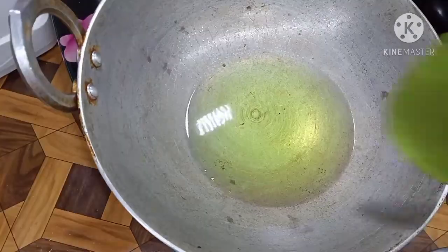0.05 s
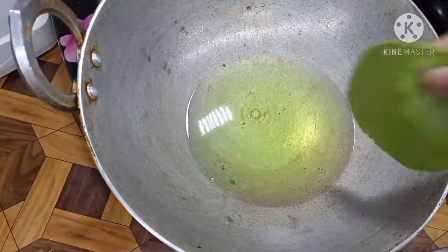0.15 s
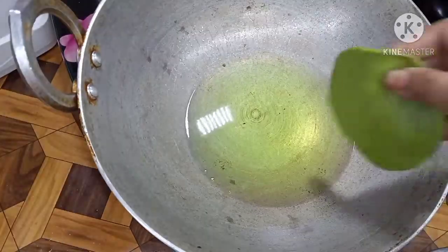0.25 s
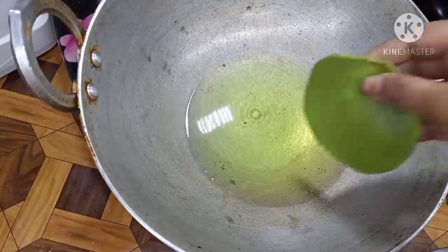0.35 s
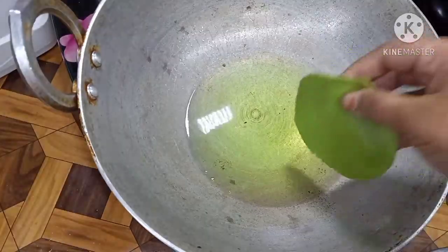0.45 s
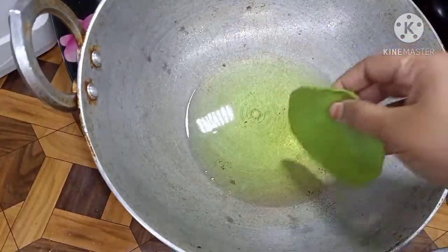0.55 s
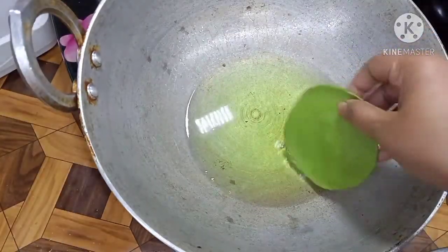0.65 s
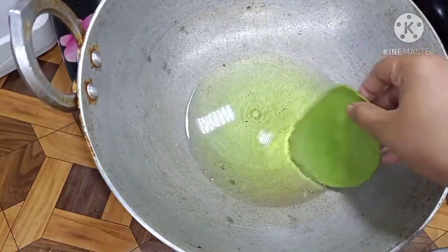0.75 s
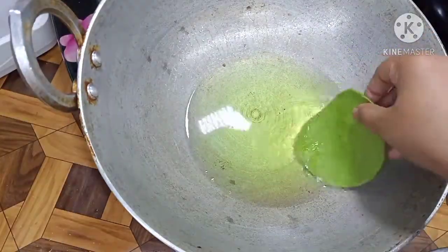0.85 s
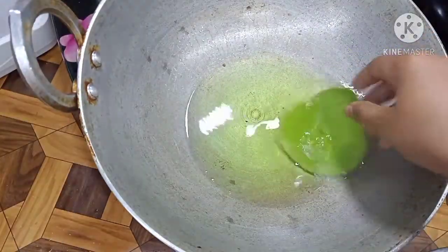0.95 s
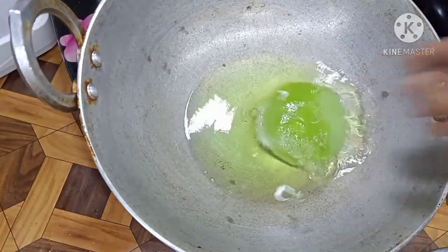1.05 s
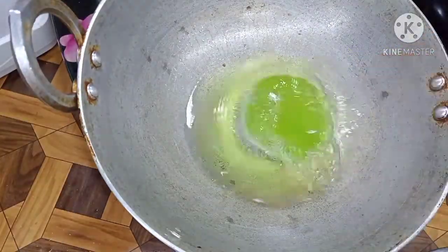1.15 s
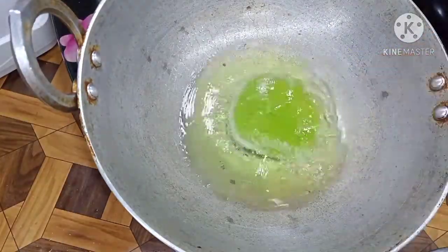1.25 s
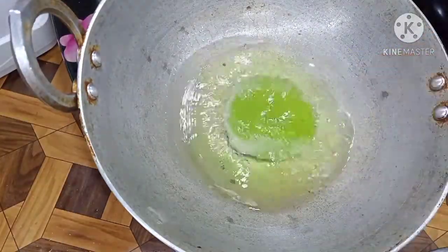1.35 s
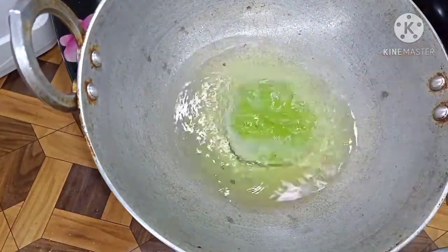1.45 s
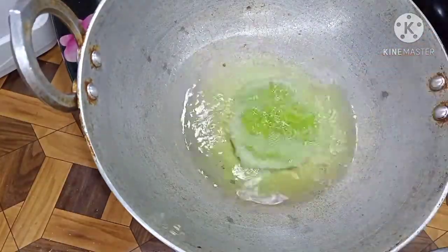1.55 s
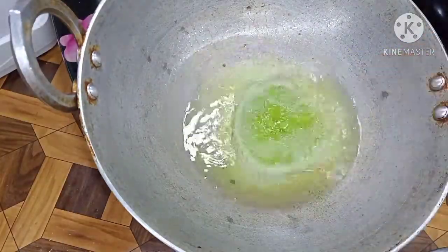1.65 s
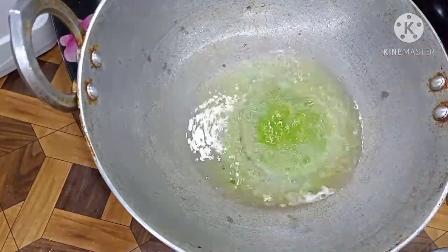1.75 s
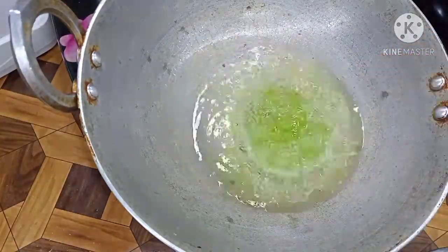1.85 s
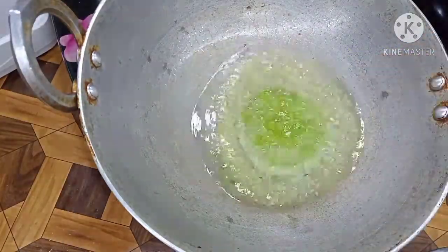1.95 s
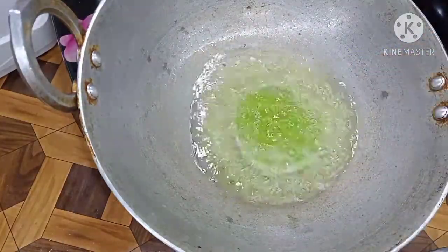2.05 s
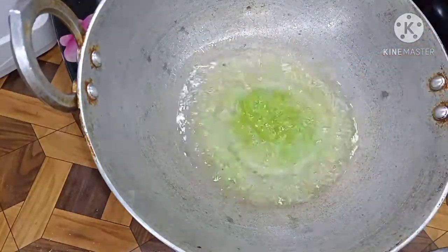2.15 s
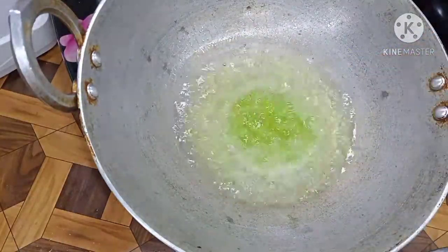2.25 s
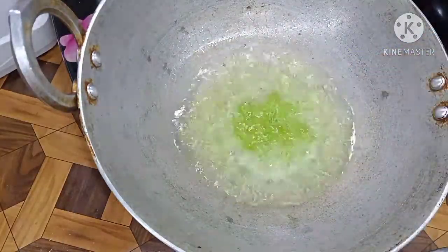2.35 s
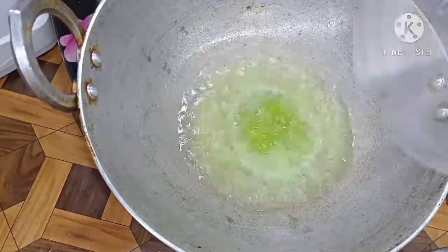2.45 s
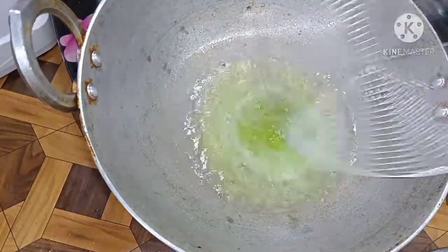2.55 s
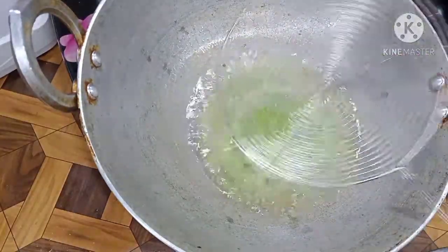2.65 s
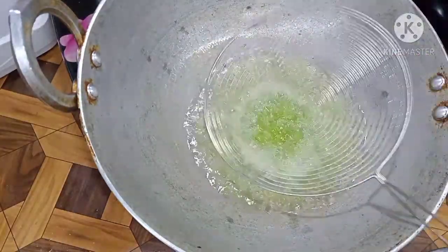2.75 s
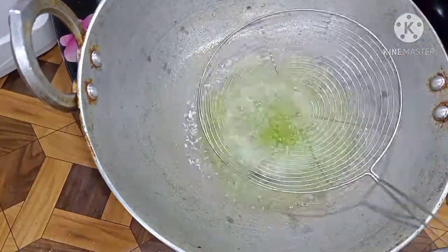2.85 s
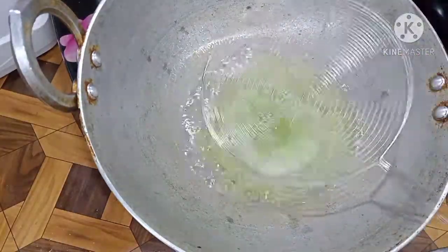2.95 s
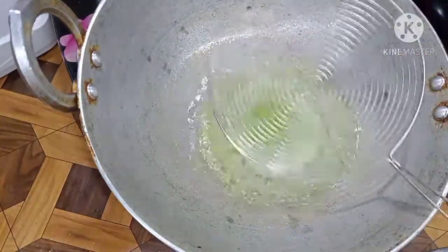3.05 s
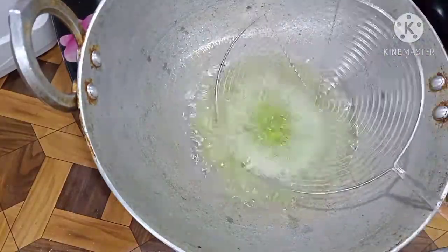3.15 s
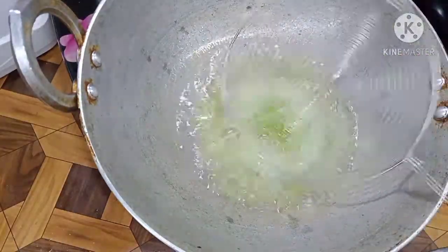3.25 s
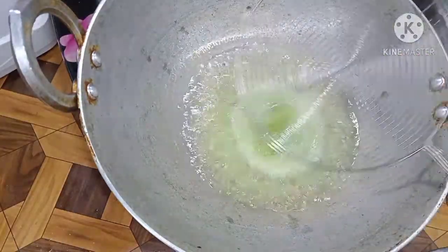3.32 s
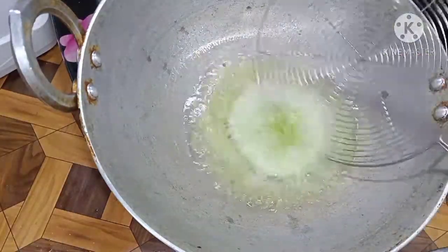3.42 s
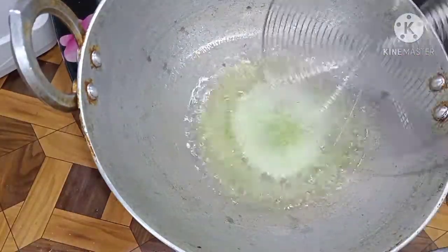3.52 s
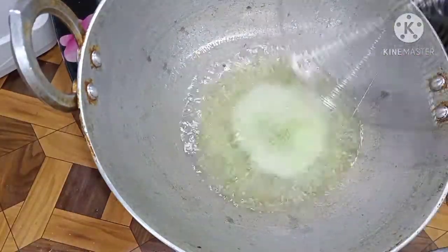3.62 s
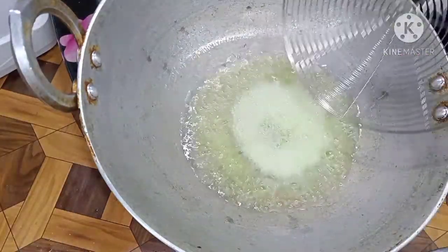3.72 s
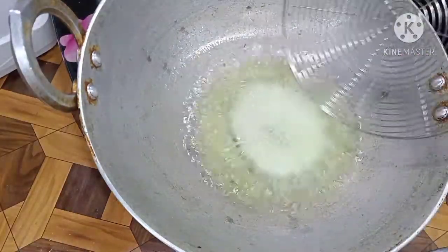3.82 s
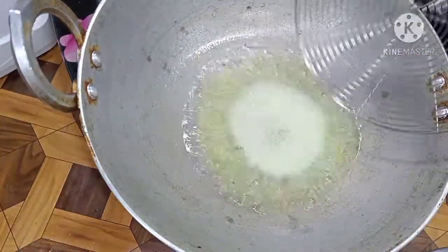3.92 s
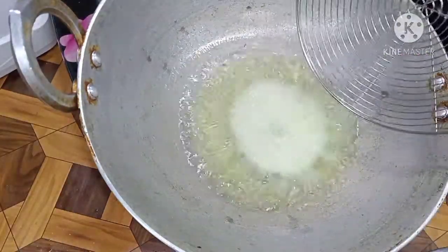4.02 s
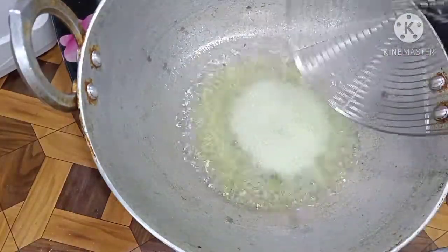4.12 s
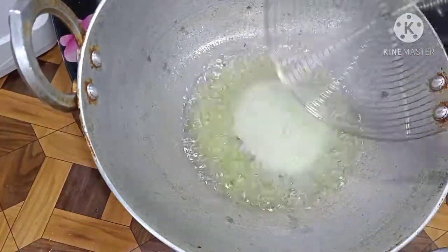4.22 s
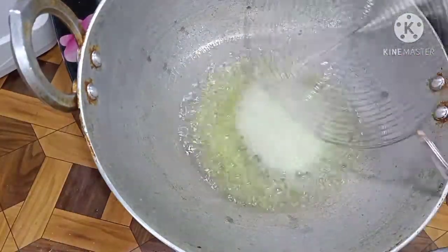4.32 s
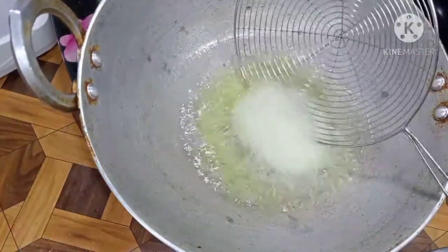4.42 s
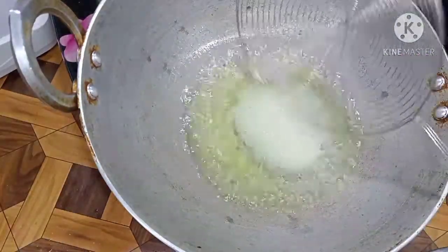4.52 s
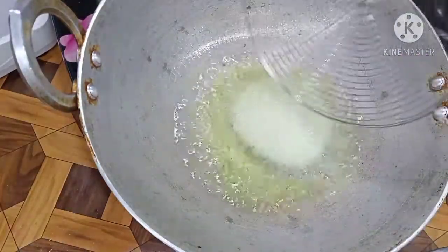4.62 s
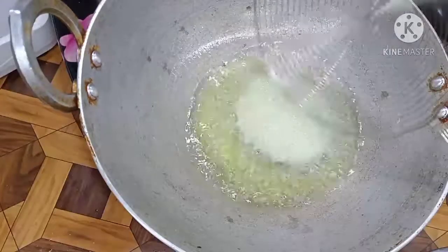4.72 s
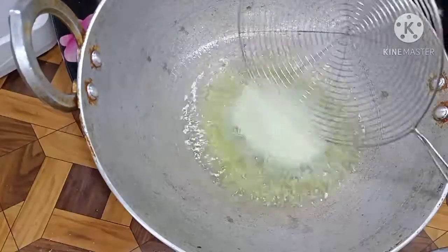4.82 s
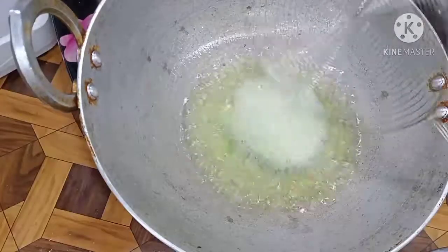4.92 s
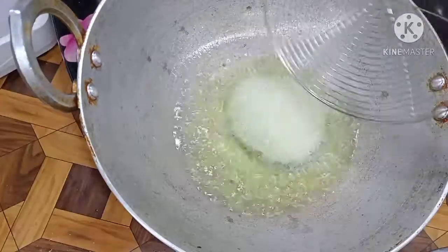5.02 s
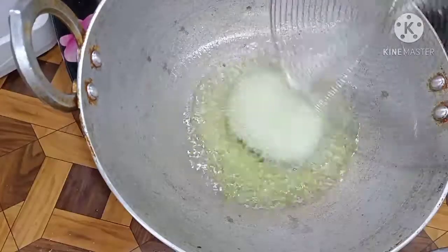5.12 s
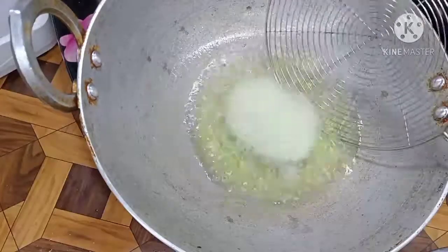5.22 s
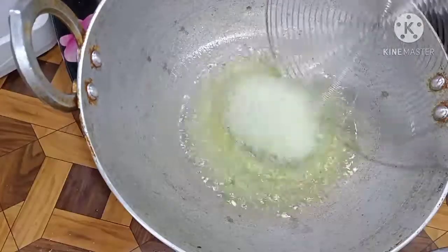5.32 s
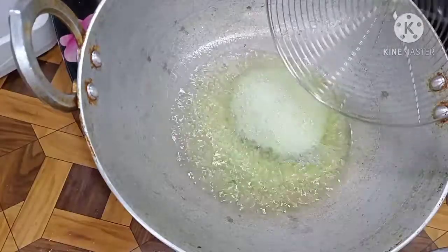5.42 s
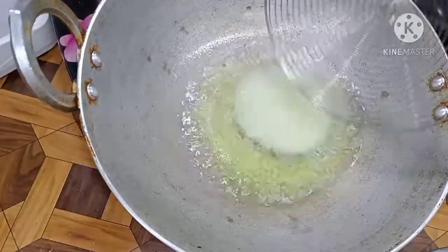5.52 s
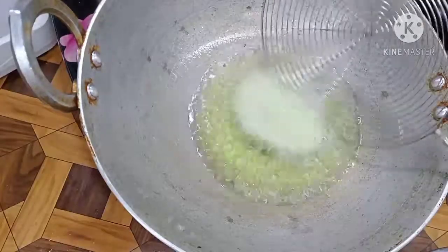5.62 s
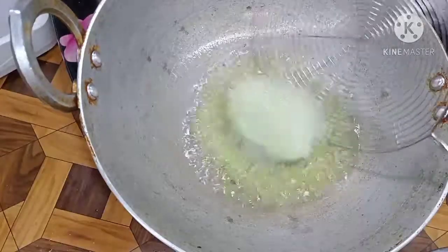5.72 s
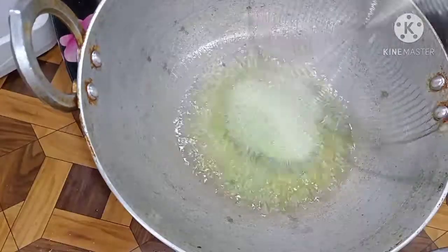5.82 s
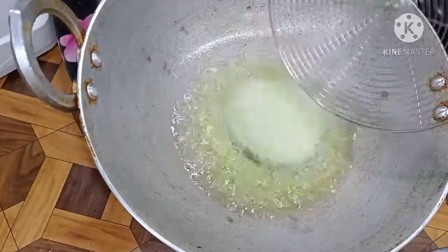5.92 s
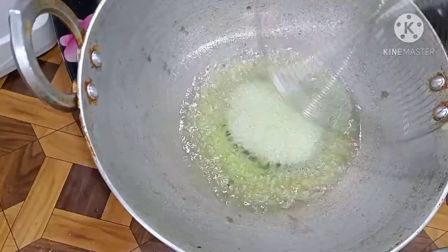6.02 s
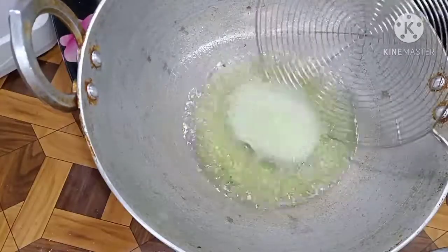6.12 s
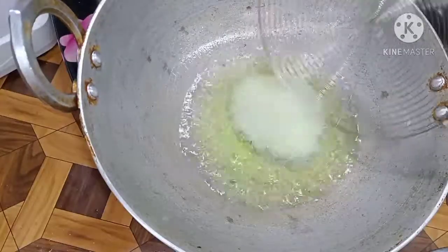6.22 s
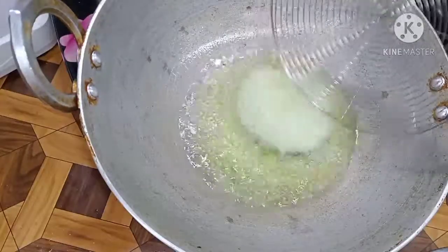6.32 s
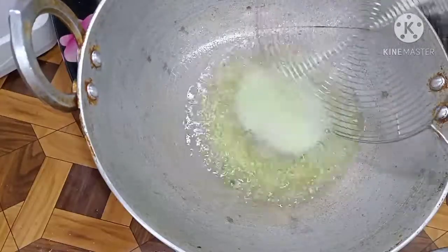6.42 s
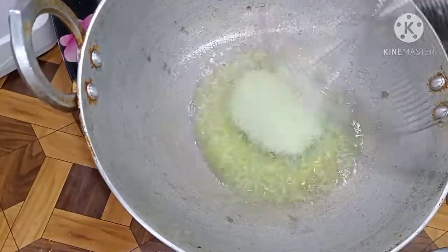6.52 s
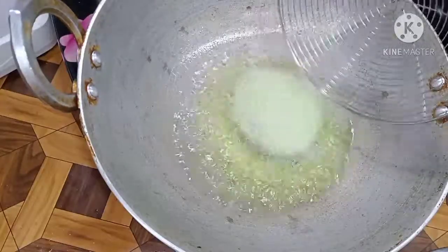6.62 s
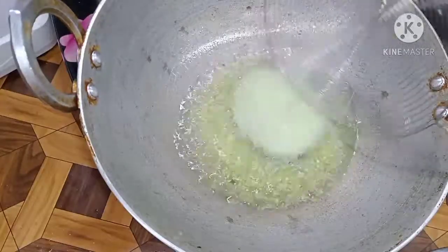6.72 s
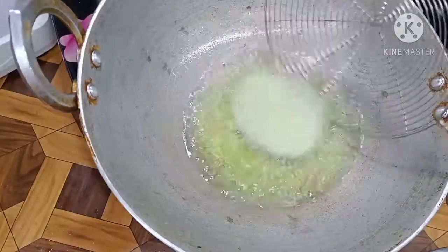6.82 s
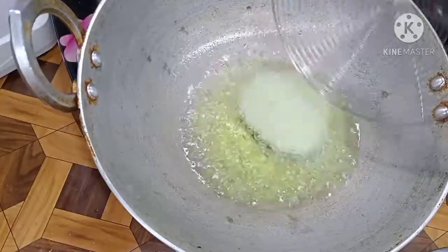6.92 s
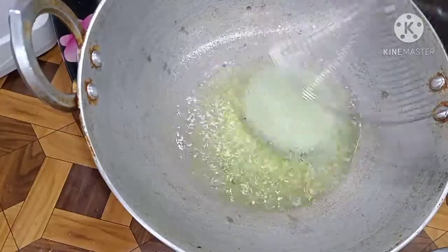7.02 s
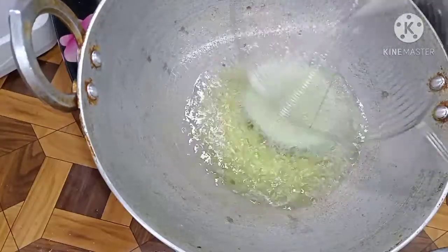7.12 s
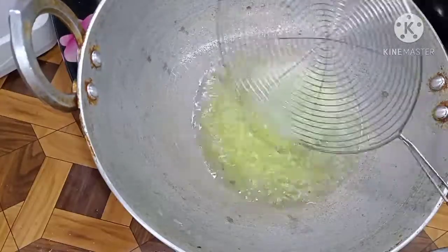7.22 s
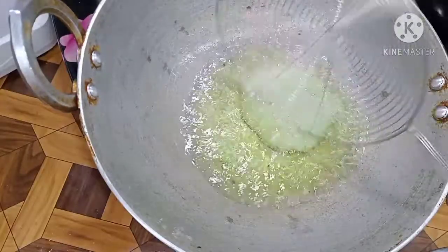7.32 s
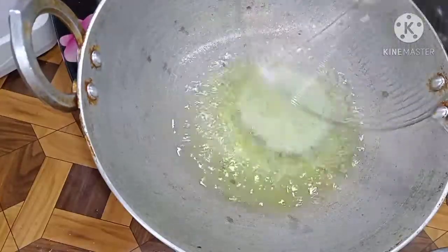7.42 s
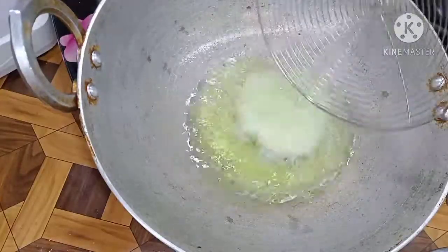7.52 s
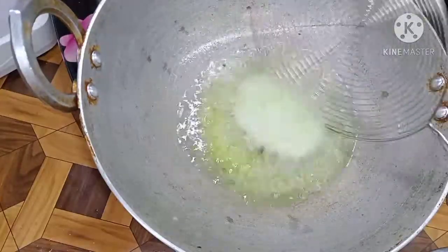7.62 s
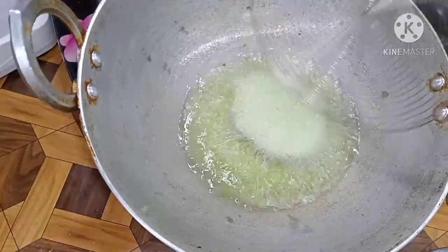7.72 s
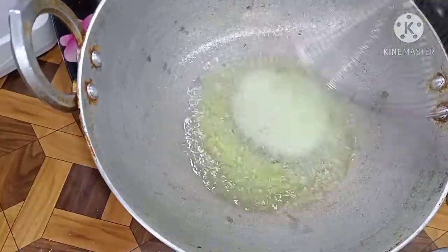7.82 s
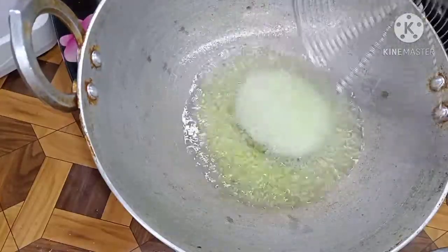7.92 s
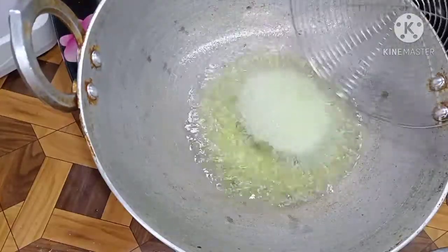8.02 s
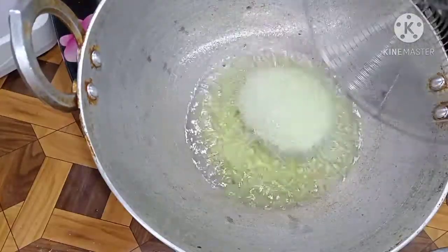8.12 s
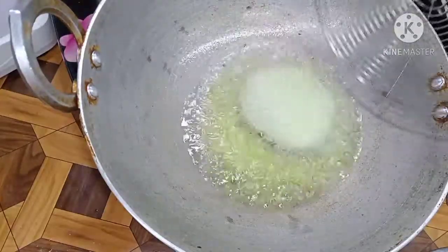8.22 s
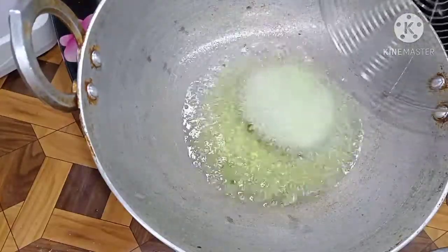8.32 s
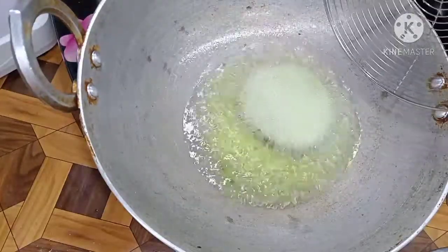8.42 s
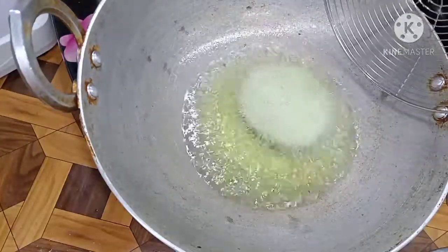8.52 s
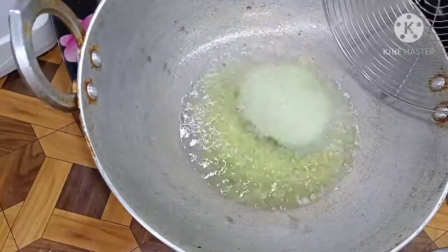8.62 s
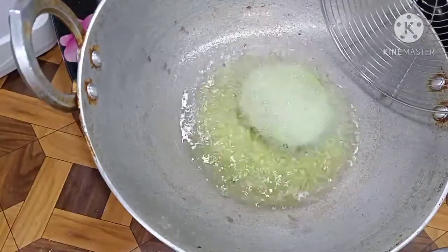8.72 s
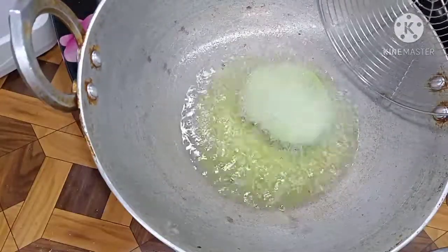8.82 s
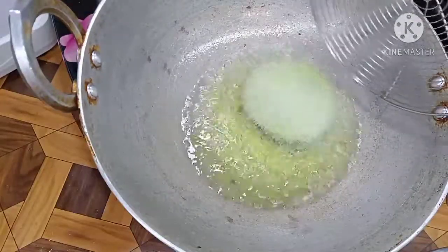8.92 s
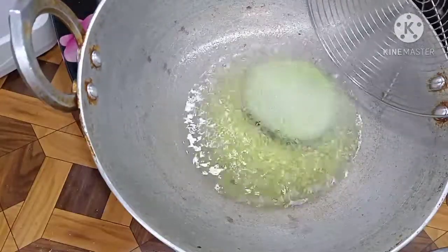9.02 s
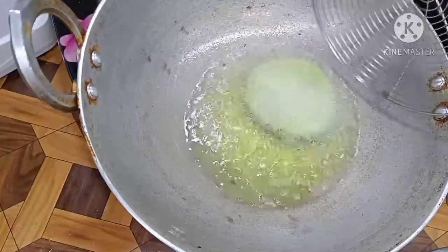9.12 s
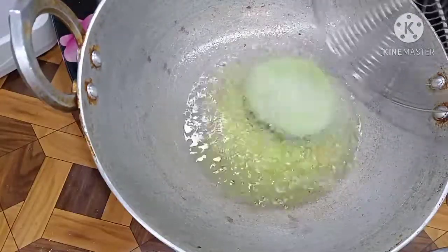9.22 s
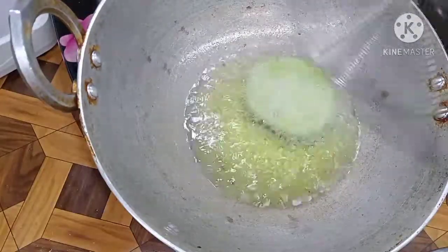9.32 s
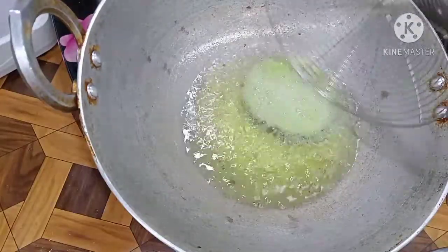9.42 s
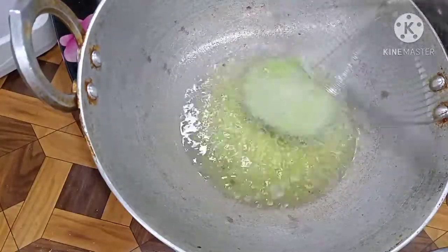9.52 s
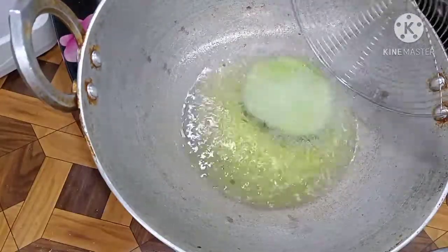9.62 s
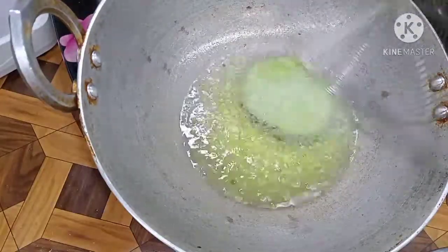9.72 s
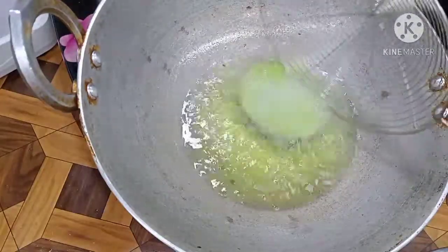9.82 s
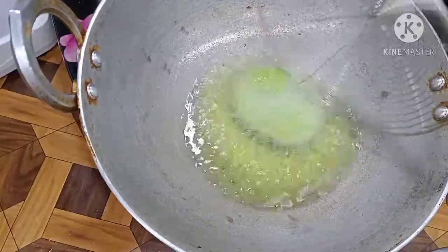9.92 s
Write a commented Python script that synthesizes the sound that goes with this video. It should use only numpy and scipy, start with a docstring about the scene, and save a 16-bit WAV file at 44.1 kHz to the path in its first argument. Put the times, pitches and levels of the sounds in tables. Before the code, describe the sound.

Dough frying in hot oil, heard close and dry with a very short room tail. Nearly quiet at first, then a soft wet hiss grows into busy sizzling and irregular low bubble knocks. One hard crack of spitting water and a quick metallic chatter of the skimmer stand out early. Later come two tiny squeaky pops, scattered plops, and rising fine fizz that stays strong to the end.

```python
"""A round of dough fries in hot oil in a metal wok, heard from close above in a small kitchen.
Its steam simmers, sizzles and fizzes as dense coloured crackle; bigger bubbles plop as short decaying tones.
Noise with narrow peaks whistles at the wet edge, steam pockets squeak as brief tones, droplets hiss as fine crackle.
Water spits as cracks with short rings, and a wire skimmer chatters once on the wok as struck metal modes.
Underneath, coloured noise makes the stove's faint hiss and rumble."""
import sys
import numpy as np
from scipy import signal
from scipy.fft import rfft, irfft, next_fast_len
from scipy.io import wavfile
from scipy.ndimage import uniform_filter1d, map_coordinates

SR = 44100
rng = np.random.default_rng(int(sys.argv[2]) if len(sys.argv) > 2 else 0)


def transcribe(u):
    """Save the signal u as a 16-bit wav file named by the first command-line argument.

    u: samples, shape (n,) or (channels, n), limited to [-1, 1]; the rate is SR.
    q: integer samples, one column per channel.
    """
    v = np.clip(np.atleast_2d(u).T, -1, 1)
    q = np.round(v * 32767).astype(np.int16)
    wavfile.write(sys.argv[1], SR, q)


N = 438794
TOUCH_S = 0.8  # the dough meets the oil

# the biggest steam bubbles bursting: t/s, peak before the room/dB, pitch f/Hz
BIG_BUBBLES = [(1.197, -38.5, 1380), (1.595, -38.5, 1710), (1.736, -33.5, 1580), (1.899, -27.5, 1410),
               (2.048, -30.5, 1150), (2.27, -26, 1410), (2.391, -28.5, 1120), (2.431, -26.5, 1120),
               (2.542, -25.5, 1450), (2.653, -30, 1390), (2.664, -22.5, 1800), (2.6865, -24, 1680),
               (2.709, -28, 1740), (2.787, -26, 1230), (2.844, -27, 1090), (2.964, -29.5, 1710),
               (3.037, -29.5, 1730), (3.077, -29, 820), (3.2128, -22.5, 885), (3.248, -30, 1800),
               (3.286, -26.5, 1370), (3.43, -21, 1390), (3.539, -27.5, 850), (3.746, -24.5, 854),
               (3.7743, -24, 2140), (3.8205, -29, 800), (3.881, -27, 1470), (4.097, -27, 656),
               (4.14, -29.5, 900), (4.269, -32, 1000), (4.607, -28.5, 1230), (4.743, -30, 1260),
               (4.787, -34, 930), (4.882, -32, 850), (4.894, -30, 1100), (5.072, -29.5, 684),
               (5.298, -26, 1310), (5.304, -29, 750), (5.498, -26.5, 970), (5.515, -29, 710),
               (5.599, -27.5, 1000), (5.757, -29, 1050), (5.96, -20.5, 1160), (5.998, -33, 900),
               (6.012, -28, 800), (6.088, -30.5, 760), (6.151, -27.5, 1300), (6.199, -33, 800),
               (6.209, -29.5, 1100), (6.371, -31.5, 870), (6.463, -31.5, 790), (6.516, -29, 940),
               (6.632, -31.5, 1080), (6.673, -27, 865), (6.875, -30, 1700), (7.193, -28.5, 1450),
               (7.317, -22.5, 1140), (7.347, -29, 2070), (7.586, -29, 875), (7.607, -29.5, 1310),
               (7.697, -27, 790), (7.943, -25.5, 1080), (7.994, -33, 770), (8.119, -29.5, 1090)]
# steam pockets squeezing out from under the dough: t/s, peak before the room/dB, pitch f/Hz, swell and fade time/s
STEAM_POCKETS = [(1.034, -52, 2590, 0.0027), (1.055, -59, 1880, .012), (1.172, -57, 1220, .016),
                 (6.206, -28, 2830, 0.0038), (6.8685, -22.5, 2910, 0.0012)]
# colour of the bubbles ringing in the bowl of the wok: f/Hz, relative level/dB
WOK_COLOUR = [(130, -16.5), (250, -12), (355, -9), (434, -1.5), (699, 2), (822, -1), (968, -6),
              (1140, -0.5), (1520, -3), (1700, -2.5), (1900, 2), (2540, 2.5), (2840, -3.5), (3220, -1),
              (5000, -24), (6500, -58), (11000, -120)]
# colour of the smallest bubbles: f/Hz, relative level/dB
FIZZ_COLOUR = [(2940, -19), (3900, -7), (5000, -8), (6100, -13), (6740, -10), (7560, -8), (8060, -2),
               (8420, 1), (8910, -1.5), (9780, -9.5), (10500, -13.5), (13600, -17), (22000, -120)]
# colour of the finest spray: f/Hz, relative level/dB
MIST_COLOUR = [(6180, -37), (10500, -2), (12400, -6.5), (14900, 4.5), (15600, 1)]
# boil, strong while the dough is pressed under and again when it is basted: t/s, level/dB
BOIL_LEVEL = [(1.1, -90), (1.87, -62), (1.98, -50.5), (3.8, -50.5), (4.4, -51.5), (5.2, -61), (7.4, -54.5),
              (7.65, -50), (8.1, -55.5), (9.55, -57), (9.9, -53)]
# sizzle, which climbs as the dough heats through: t/s, level/dB
SIZZLE_LEVEL = [(0.8, -84), (0.87, -71), (1.0, -65), (1.39, -57.5), (2.25, -53), (2.63, -53), (2.86, -51),
                (4.11, -50.5), (4.95, -47.5), (6.38, -49.5), (7.4, -47.5), (8.04, -48.5), (8.9, -46.5),
                (9.28, -49), (9.95, -49)]
# fizz, which swells whenever fresh oil washes over the dough: t/s, level before the trim in frying()/dB
FIZZ_LEVEL = [(0.79, -85), (0.85, -78.5), (1.24, -58), (1.45, -62), (1.69, -58.4), (1.84, -66.7),
              (2.47, -61.5), (2.8, -64), (3.07, -60.5), (3.37, -62.8), (3.43, -57), (3.64, -62.5),
              (4.47, -56.9), (4.65, -59.5), (4.92, -53.5), (5.1, -57.5), (5.4, -51.9), (5.55, -56.5),
              (5.88, -53.5), (6.06, -57.5), (6.51, -56.5), (6.84, -53), (7.38, -54.8), (7.5, -51),
              (7.65, -59.5), (7.83, -52), (9.08, -48.5), (9.38, -51), (9.53, -50), (9.95, -52)]


def amp(db):
    """Decibels to gain."""
    return 10 ** (np.asarray(db) / 20)


def unit(x):
    """Scale to rms 1."""
    return x / np.sqrt(np.mean(x ** 2) + 1e-20)


def along(points, hz):
    """(Hz, value) points read on a log frequency axis."""
    f, value = np.transpose(points)
    return np.interp(np.log(hz + 1), np.log(f + 1), value)


def level_curve(rows):
    """(s, dB) points as one level per sample, -120 dB before the first."""
    s, db = np.transpose(rows)
    return np.interp(np.arange(N) / SR, s, db, left=-120)


def follows(level_db, grows):
    """A level that swings more or less than another one and meets it at the top."""
    return level_db.max() + grows * (level_db - level_db.max())


def envelope(t, attack, hold, t60):
    """Gain at t seconds after the start: rise, hold, fade."""
    return np.clip(t / attack, 0, 1) * amp(-60 * np.maximum(t - attack - hold, 0) / t60)


def wobble(rate):
    """A smooth random curve, rate knots a second."""
    knots = rng.standard_normal(int(N * rate / SR) + 4)
    return map_coordinates(knots, [np.arange(N) * rate / SR])


def filtered(x, response):
    """x shaped by a response given as a function of frequency."""
    m = next_fast_len(N + SR // 2)
    return irfft(rfft(x, m) * response(np.fft.rfftfreq(m, 1 / SR)), m)[:N]


def noise(spectrum):
    """Coloured noise of rms 1."""
    return unit(filtered(rng.standard_normal(N), lambda hz: amp(along(spectrum, hz))))


def singing(peaks):
    """Noise of rms 1 in narrow resonances."""
    def response(f):
        return sum(amp(db) * 1j * f * width / (centre * centre - f * f + 1j * f * width)
                   for centre, width, db in peaks)
    return unit(filtered(rng.standard_normal(N), response))


def impulse(spectrum, size=2048):
    """The minimum-phase impulse response that has this spectrum."""
    gain = amp(along(spectrum, np.fft.rfftfreq(size, 1 / SR)))
    cepstrum = irfft(np.log(np.maximum(gain, 1e-3)))
    # fold the cepstrum so that the response is causal
    cepstrum[1:size // 2] *= 2
    cepstrum[size // 2 + 1:] = 0
    return irfft(np.exp(rfft(cepstrum)))


def kitchen(x, wet_db):
    """x with a short diffuse tail from the walls close by, each frequency dying at its own rate."""
    # decay of the room: f/Hz, t60/s
    wall_decay = [(200, 0.096), (3000, 0.11), (12000, 0.062)]
    hz, t, z = signal.stft(rng.standard_normal(SR // 4), SR, nperseg=256)
    decay = amp(-60 * t / along(wall_decay, hz)[:, None])
    tail = signal.istft(z * decay, SR, nperseg=256)[1]
    tail[:SR // 400] = 0  # gap before the walls answer
    tail *= amp(wet_db) / np.linalg.norm(tail)
    tail[0] = 1  # direct sound
    return signal.fftconvolve(x, tail)


def add(track, s, x):
    """Mix x into the track at time s."""
    part = track[max(round(s * SR), 0):][:len(x)]
    part += x[:len(part)]


def low_cut(x, edge_hz):
    """Small sources radiate little bass."""
    return signal.lfilter(*signal.butter(2, edge_hz, "high", fs=SR), x)


def bounced(x, delay, share):
    """x and its reflection off the side of the wok, delay in seconds."""
    lag = max(round(delay * SR), 1)
    return np.pad(x, (0, lag)) + share * np.pad(x, (lag, 0))


def bubble(hz, cycles, size=1024):
    """A pocket of steam rings for a few cycles, with a softened start."""
    turns = hz * np.arange(size) / SR
    return np.sin(2 * np.pi * turns) * np.exp(-turns / cycles) * (1 - np.exp(-2 * np.pi * turns))


def burst(hz, cycles, swell, size=1024):
    """A big bubble swings up for a fraction of a cycle, bursts at a quarter of the length and rings down."""
    turns = hz * (np.arange(size) - size // 4) / SR
    return np.sin(2 * np.pi * turns) * np.exp(np.minimum(turns / swell, -turns / cycles))


def crackle(spectrum, rate, spread_db, wet_db):
    """A dense rain of tiny bursts of uneven size, rate a second on average, rms 1."""
    hits = rng.random(N) < rate / SR
    sizes = amp(spread_db * np.minimum(rng.standard_normal(N), np.e))
    bursts = hits * rng.choice([-1, 1], N) * sizes
    return unit(signal.fftconvolve(kitchen(bursts, wet_db), impulse(spectrum))[:N])


def struck(modes, contact_t60, ring_t60, ring_db):
    """Metal rings hard during the contact, then dies away more softly; rms 1 over its first hundredth of a second."""
    t = np.arange(SR // 5) / SR
    ring = np.zeros(len(t))
    for (hz, db), (level, turn, drift) in zip(modes, rng.standard_normal((len(modes), 3))):
        ring += amp(db + 2 * level) * np.sin(2 * np.pi * (hz + 20 * drift) * t + .5 * turn)
    ring *= amp(-60 * t / contact_t60) + amp(ring_db - 60 * t / ring_t60)
    return ring / np.std(ring[:SR // 100])


def stove(hiss_db=-72, whistle_db=-82, rumble_db=-72.5, churn_db=-19.5):
    """The burner's faint hiss and whistle over a low rumble, which grows as the oil churns."""
    # colour of stove and kitchen: f/Hz, relative level/dB
    hiss_colour = [(88, -28), (150, -17), (186, -7), (205, -7), (437, -11), (541, -8.5), (1610, -16),
                   (1950, -12.5), (2930, -18), (3700, -21.5), (3930, -24), (6380, -37.5), (8380, -28),
                   (9600, -34.5), (15600, -39)]
    # thin burner tones: f/Hz, width/Hz, relative level/dB
    burner_tones = [(1860, 49, -3.5), (3550, 25, -5), (5230, 40, -19)]
    # colour of the low rumble: f/Hz, relative level/dB
    rumble_colour = [(15, -57), (25, -36), (38, -32), (55, -5.5), (75, 4.5), (176, 3.5), (214, -3.5),
                     (330, -1.5), (430, -48), (730, -120)]
    churn = amp(level_curve(SIZZLE_LEVEL) + churn_db)  # the oil's rumble against the sizzle
    rumble_gain = np.hypot(amp(rumble_db), churn) * amp(2.0 * wobble(5.9))
    hiss = amp(hiss_db) * noise(hiss_colour)
    whistle = amp(whistle_db) * singing(burner_tones)
    return hiss + whistle + rumble_gain * noise(rumble_colour)


def skimmer(tick_t60=0.0055, hoop_rise_s=0.00049):
    """Each tap rings the stiff hoop and the thin wires, with a bright tick of metal on metal."""
    # taps on the wok: t/s, hoop level/dB, wire level/dB, tick level/dB
    taps = [(3.4168, -54, -37, -23.5), (3.4409, -18, -33.5, -36), (3.4447, -27.5, -41, -42),
            (3.4777, -39, -37, -41), (3.5013, -41, -33.5, -43)]
    # modes of the hoop: f/Hz, relative level/dB
    hoop_modes = [(2870, -13), (3040, -2), (3177, -0.5), (3352, -4.5), (3508, -7), (4016, -11)]
    # modes of the wires: f/Hz, relative level/dB
    wire_modes = [(4823, -50), (5599, -54), (6078, -45), (6212, -46), (6261, -64), (6406, -43), (6934, -46),
                  (7101, -50), (7580, -68), (7720, -49), (7854, -65), (7946, -47), (8193, -65), (8409, -43),
                  (8559, -51), (8866, -72), (9152, -60), (9270, -55), (9518, -73), (10094, -63)]
    track, t = np.zeros(N), np.arange(SR // 5) / SR
    for s, hoop_db, wire_db, tick_db in taps:
        hoop = struck(hoop_modes, contact_t60=0.026, ring_t60=0.051, ring_db=-16)
        hoop *= 1 - np.exp(-t / hoop_rise_s)
        wires = struck(wire_modes, contact_t60=0.023, ring_t60=0.091, ring_db=-6)
        bright = noise(FIZZ_COLOUR) + amp(-16) * noise(MIST_COLOUR)
        tick = bright[:len(t)] * amp(-60 * t / tick_t60)
        add(track, s, amp(hoop_db) * hoop + amp(wire_db) * wires + amp(tick_db) * tick)
    return kitchen(low_cut(track, edge_hz=610), wet_db=-9.5)[:N]


def spray(offset_db=-6, grows=1.2, swing=0.25, average_s=1.0):
    """Tiny droplets fly off the fizzing foam with a thin, uneven hiss; they answer its quick swells more strongly."""
    fizz_db = level_curve(FIZZ_LEVEL)
    average_db = uniform_filter1d(fizz_db, max(int(average_s * SR), 1))
    swell_db = np.clip(fizz_db - average_db, -7, 4)
    spray_db = follows(fizz_db, grows) + offset_db + swing * swell_db
    gain = amp(spray_db + 1.2 * wobble(6.2) + 1.3 * wobble(35))
    return gain * crackle(MIST_COLOUR, rate=3500, spread_db=3.8, wet_db=-9)


def wet_edge(level_db=-67):
    """Steam escapes in thin, wavering whistles where the dough first meets the oil."""
    # steam whistles: f/Hz, width/Hz, relative level/dB
    whistles = [(2140, 110, -10), (2810, 67, -4), (3250, 32, 0), (3840, 51, 3.5), (4800, 130, -12),
                (5610, 47, -15), (5940, 37, -6), (6640, 95, -15), (7180, 45, -12), (8700, 80, -7)]
    touch = envelope(np.arange(N) / SR - TOUCH_S, attack=.018, hold=0.16, t60=0.67)
    return amp(level_db + 2.2 * wobble(30.2)) * touch * singing(whistles)


def first_bubbles(level_db=-62, length_s=.8, rate=110, octaves=0.64, cycles=35, tilt_db=-7,
                  young_hz=3380, grown_hz=907, growth_s=0.17):
    """In calm oil the first bubbles ring clearly, ever lower as they grow; the small high ones are weaker."""
    track = np.zeros(N)
    for place, size in rng.random((N // 100, 2))[:int(rate * length_s)]:
        age = place * length_s
        above = min(-octaves * np.log(1 - size), 2)  # octaves over the lowest pitch
        lowest_hz = grown_hz + (young_hz - grown_hz) * np.exp(-age / growth_s)
        gain = amp(level_db + tilt_db * above) * envelope(age, attack=0.21, hold=.02, t60=2.2)
        add(track, TOUCH_S + age, gain * bubble(lowest_hz * 2 ** above, cycles, size=4096))
    return track


def squeaks():
    """A steam pocket sings for a few thousandths of a second, swelling and fading."""
    track, t = np.zeros(N), np.arange(-SR // 10, SR // 10) / SR
    for s, db, hz, swell_s in STEAM_POCKETS:
        tone = np.sin(2 * np.pi * hz * t) * np.exp(-np.abs(t) / swell_s)
        add(track, s + t[0], amp(db) * kitchen(tone, wet_db=-12))
    return track


def spits(crack_time=0.00065, crack_hz=8000, echo_delay=.0008, echo_share=0.48):
    """Trapped water flashes to steam with a crack and leaves a small ringing cavity."""
    # drops: t/s, peak before the room/dB, pitch f/Hz, life/cycles, crack weight (halved below)
    drops = [(0.9075, -44, 2160, 5.4, .05), (1.1419, -31, 9000, 6.1, 0.78), (1.360, -44.5, 11000, 3, .7),
             (1.681, -38, 8300, 4.5, .4), (3.0841, -29, 9600, 2.3, 0.74), (3.1874, -7, 3430, 1.5, 0.64),
             (4.031, -39, 8700, 8.4, .3), (4.699, -39, 12000, 3, .6)]
    track = np.zeros(N)
    for s, db, hz, cycles, crack in drops:
        pop = bubble(hz, cycles)
        snap = signal.lfilter(*signal.butter(2, crack_hz, fs=SR), rng.standard_normal(len(pop)))
        snap *= np.exp(-np.arange(len(pop)) / SR / crack_time)
        pop = low_cut(pop + crack * snap / 2, edge_hz=610)
        pop = bounced(pop, echo_delay, echo_share)
        add(track, s, amp(db) * kitchen(pop / np.abs(pop).max(), wet_db=-12))
    return track


def boil(rate=190, wet_hz=760, dry_hz=1150, octaves=0.68, cycles=0.36, swell=0.27, spread_db=7.0):
    """Middling bubbles, each with its own pitch and strength; they get higher as the dough dries."""
    track = np.zeros(N)
    dryness = rng.random(N // 20)[:int(rate * N / SR)]  # 0 at the start, 1 at the end
    draws = np.clip(rng.standard_normal((N // 20, 2)), -1.7, 1.7)
    for dry_share, (pitch, level) in zip(dryness, draws):
        hz = (wet_hz + (dry_hz - wet_hz) * dry_share) * 2 ** (octaves * pitch)
        add(track, dry_share * N / SR, amp(spread_db * level) * burst(hz, cycles, swell))
    bowl_sound = signal.fftconvolve(track, impulse(WOK_COLOUR))[:N]
    return amp(level_curve(BOIL_LEVEL)) * unit(kitchen(bowl_sound, wet_db=-7.5)[:N])


def lesser_plops(rate=12, over_boil_db=15, spread_db=2.5, pitch_hz=1200, octaves=0.38):
    """Rows (s, peak dB, pitch Hz) of bubbles that burst at random, as strong as the oil boils."""
    times, boil_db = np.transpose(BOIL_LEVEL)
    count = int(rate * np.ptp(times))
    s = times[0] + np.ptp(times) * rng.random(N // 100)[:count]
    level, pitch = np.clip(rng.standard_normal((N // 100, 2))[:count], -2, 2).T
    peak_db = np.interp(s, times, boil_db) + over_boil_db + spread_db * level
    return list(zip(s, peak_db, pitch_hz * 2 ** (octaves * pitch)))


def plops(cycles=0.31, swell=0.23, echo_delay=0.001602, echo_share=0.76, size=1024):
    """Big bubbles burst with a dull knock, coloured by the bowl of the wok."""
    track, bowl = np.zeros(N), impulse(WOK_COLOUR)
    for s, db, hz in BIG_BUBBLES + lesser_plops():
        life, place = rng.standard_normal(2)  # each bubble varies in decay and in distance to the side
        knock = signal.fftconvolve(burst(hz, cycles * np.exp(0.21 * life), swell, size), bowl)
        knock = bounced(knock, echo_delay * np.exp(0.19 * place), echo_share)
        add(track, s - size // 4 / SR, amp(db) * kitchen(knock / np.abs(knock).max(), wet_db=-8.5))
    return track


def after_bursts(level_db, rise_s, fade_s):
    """A gain that swells and fades around every listed big bubble and squeak, relative to its peak."""
    gain, t = np.zeros(N), np.arange(-SR // 20, SR // 5) / SR
    for s, db, *_ in BIG_BUBBLES + STEAM_POCKETS:
        add(gain, s + t[0], amp(db + level_db) * np.exp(np.minimum(t / rise_s, -t / fade_s)))
    return gain


def frying(fizz_trim_db=-1.96, stirred_db=-6, simmer_db=-7, simmer_grows=1.13, rise_s=0.0019):
    """Steam leaves the dough in countless tiny bubbles of three sizes, surging and gushing; the boil stirs up simmer."""
    # colour of the larger bubbles: f/Hz, relative level/dB
    simmer_colour = [(150, -47), (250, -20), (360, -14.5), (435, -9), (657, -3), (770, -1.5), (961, -9),
                     (1180, -3), (1350, -4.5), (1710, -11), (1800, -5), (2340, -40), (3960, -120)]
    # colour of the middle bubbles: f/Hz, relative level/dB
    sizzle_colour = [(820, -30), (1400, -7), (1710, -10), (1910, -2), (2160, -0.5), (2350, -3),
                     (2590, -3.5), (2800, 2), (3000, -2.5), (3900, -7.5), (4500, -14.5), (6000, -22),
                     (7800, -33), (13200, -120)]
    sizzle_db, fizz_db = level_curve(SIZZLE_LEVEL), level_curve(FIZZ_LEVEL)
    surge = wobble(14)  # shared by sizzle and fizz

    # every big bubble lets out a gush of steam and a short wake; both grow as the dough heats through
    steam = amp((sizzle_db - sizzle_db.max()) / 2)
    gush = steam * after_bursts(-26.5, rise_s, fade_s=0.0069)
    wake = steam * after_bursts(-19, rise_s, fade_s=0.012)

    simmer = crackle(simmer_colour, rate=1100, spread_db=4.5, wet_db=-9.0)
    sizzle = crackle(sizzle_colour, rate=2600, spread_db=2, wet_db=-15.0)
    fizz = crackle(FIZZ_COLOUR, rate=5000, spread_db=2.5, wet_db=-3.5)

    steady = amp(follows(sizzle_db, simmer_grows) + simmer_db)
    stirred = amp(level_curve(BOIL_LEVEL) + stirred_db)
    simmer_gain = np.hypot(np.hypot(steady, stirred) * amp(2.45 * wobble(12)), wake)
    sizzle_gain = amp(sizzle_db + 1.05 * surge + 1.15 * wobble(55)) + gush
    fizz_gain = amp(fizz_db + fizz_trim_db + 0.51 * surge + 0.84 * wobble(45))
    return simmer_gain * simmer + sizzle_gain * sizzle + fizz_gain * fizz


def scene():
    """Stove, skimmer and everything in the oil, summed to one channel."""
    background = stove() + skimmer()
    oil = spray() + wet_edge() + first_bubbles() + squeaks() + spits() + boil() + plops() + frying()
    return (background + oil)[None]


def record(dry):
    """A sharp band limit that keeps only what lies below 15650 Hz."""
    return filtered(dry[0], lambda hz: hz < 15650)[None]


dry = scene()
out = record(dry)
transcribe(out)
```